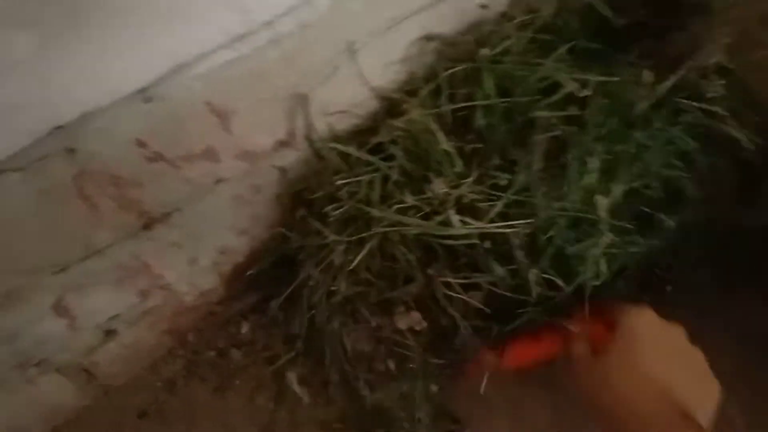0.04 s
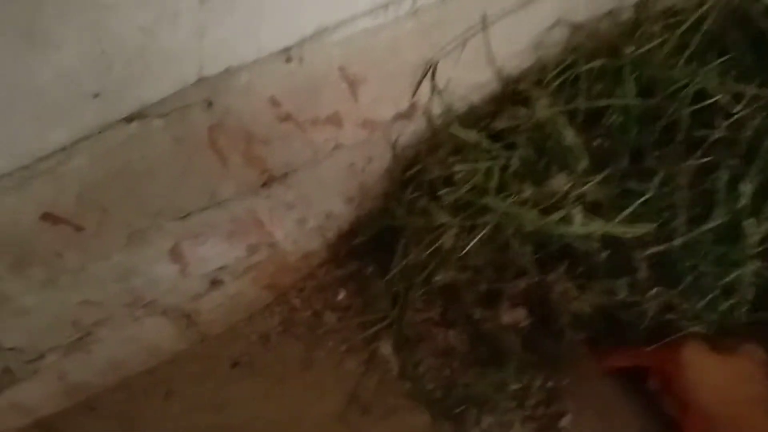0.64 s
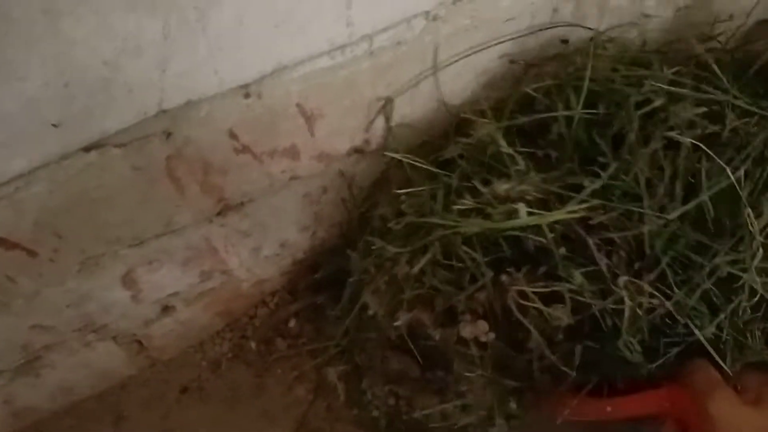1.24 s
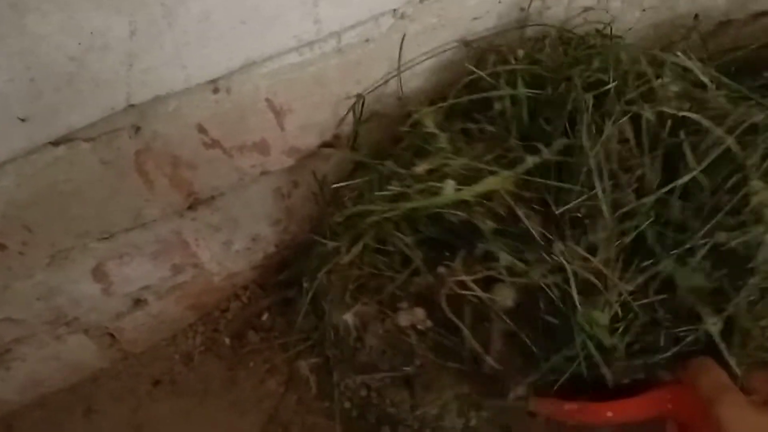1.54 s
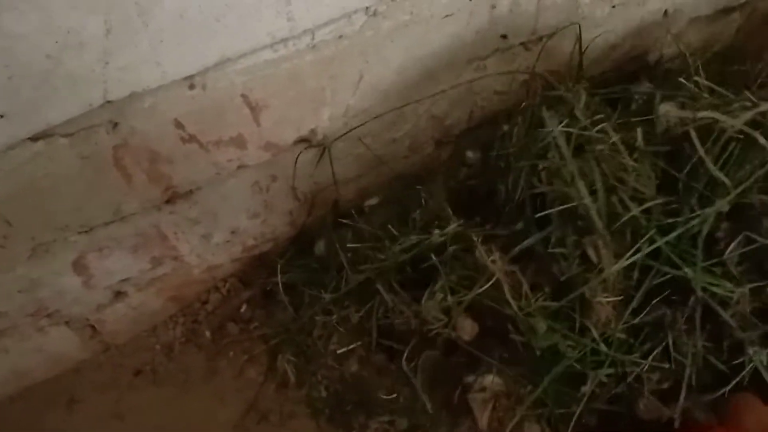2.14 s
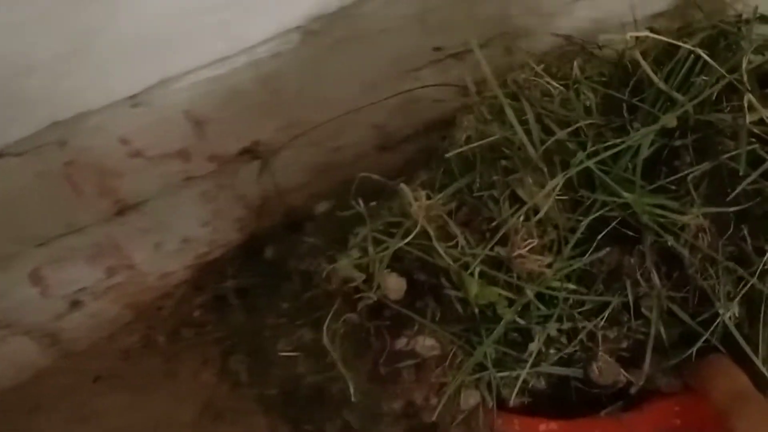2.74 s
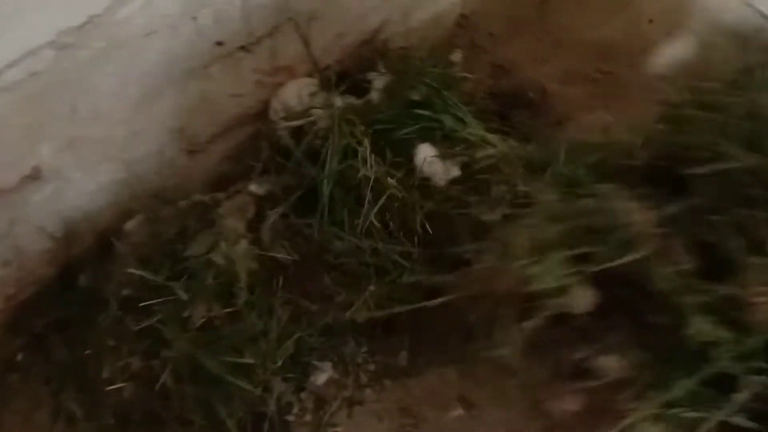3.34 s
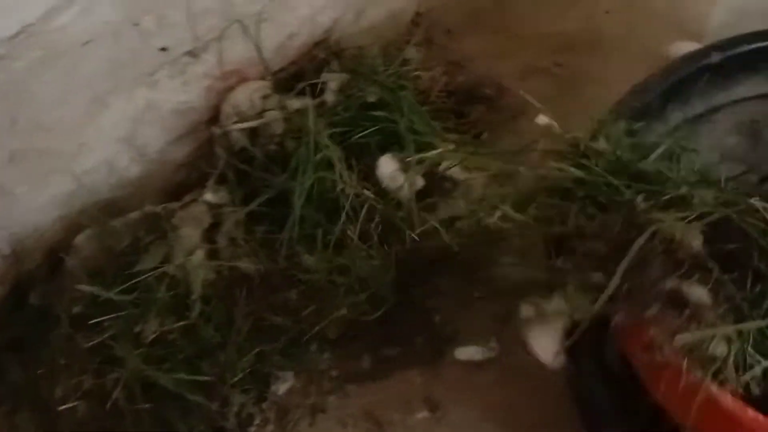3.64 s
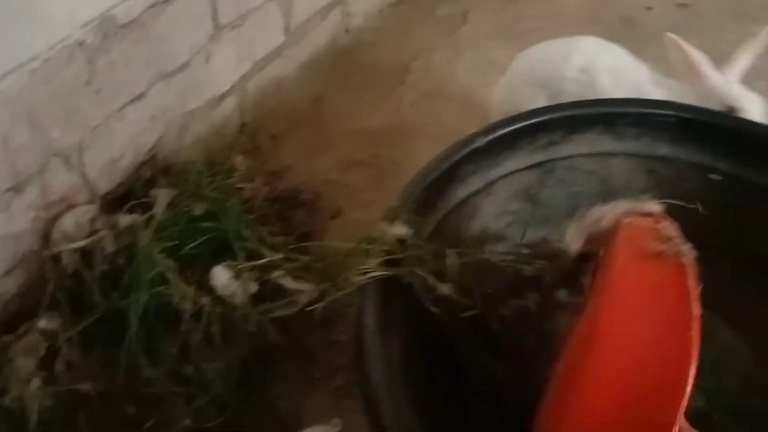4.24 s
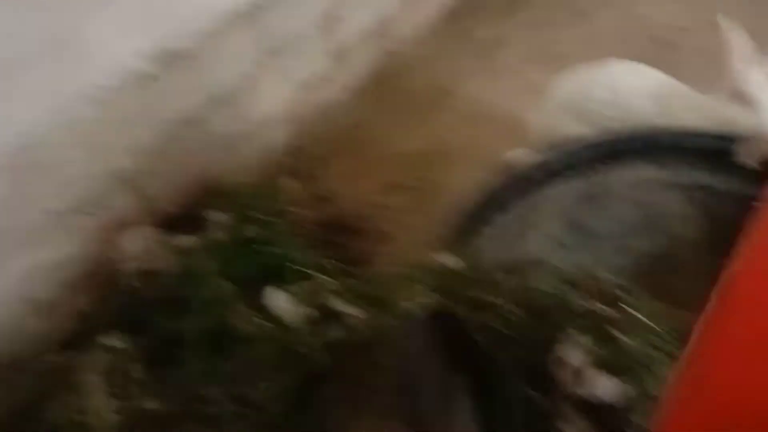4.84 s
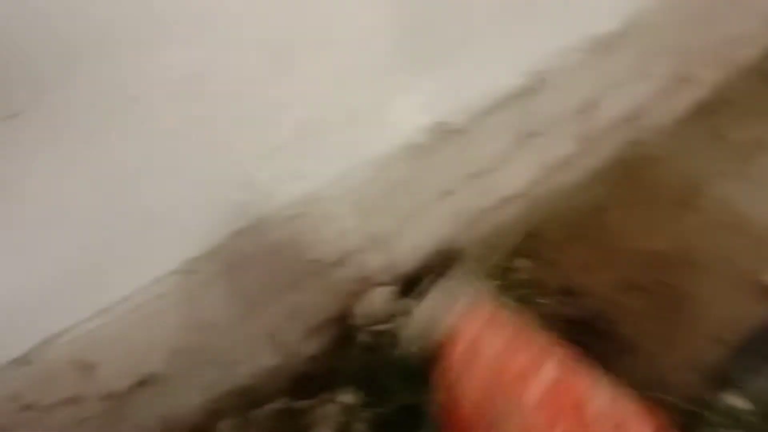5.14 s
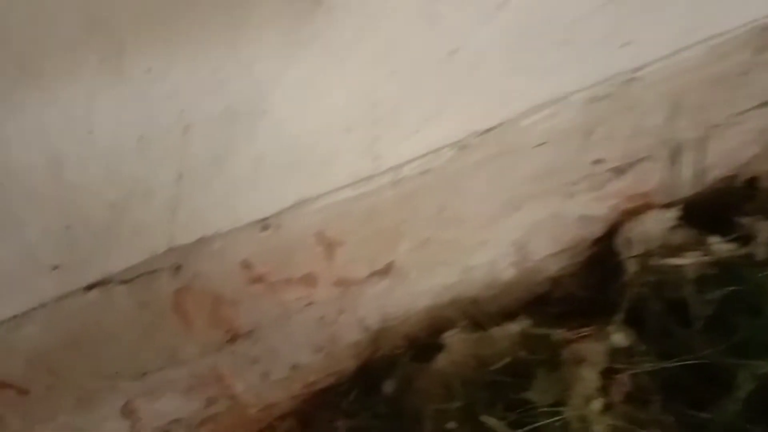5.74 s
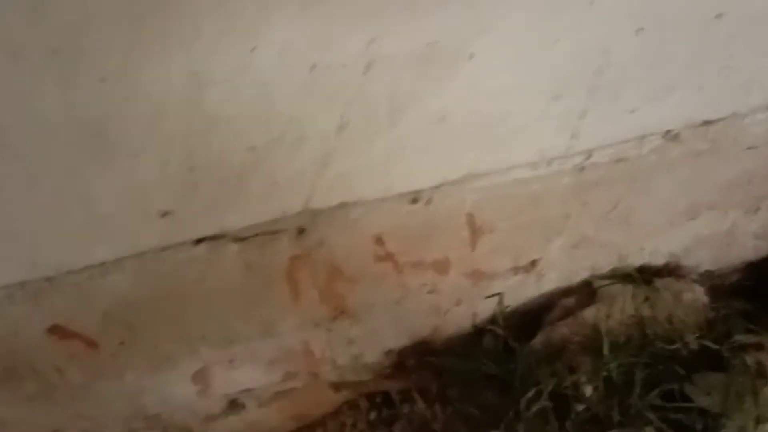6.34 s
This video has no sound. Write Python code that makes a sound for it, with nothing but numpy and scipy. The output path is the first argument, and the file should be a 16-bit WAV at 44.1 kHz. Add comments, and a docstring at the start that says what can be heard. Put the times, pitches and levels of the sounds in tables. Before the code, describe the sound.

Close, gritty scrapes of a plastic scoop pushing hay and droppings over concrete, light at first, with faint rustling and small snaps between them. Then comes a loud cluster of hollow knocks, thuds and rasps as the scoop empties into a tub. It dies away, and a final forceful scrape follows with clicks and short squeals. The small room adds a brief echo, and a faint low rumble lies under the strokes.

```python
"""First comes a knock and a gritty scrape: a plastic dustpan is pushed through hay and droppings over
a concrete floor, in a small room. Grit catches the lip and excites the resonances of the plate and the
hollow of the scoop; dry stalks crackle and snap, and stick-slip friction adds brief squeals.
The pan knocks, thuds and skids as a load is tipped into a tub, then starts one more hard stroke."""
import sys
import numpy as np
from scipy import signal
from scipy.fft import rfft, irfft, next_fast_len
from scipy.io import wavfile
from scipy.ndimage import uniform_filter1d

SR = 44100
rng = np.random.default_rng(int(sys.argv[2]) if len(sys.argv) > 2 else 0)


def wrap_up_sound(samples):
    """Save the sound to the file named by the first command line argument, as 16-bit audio."""
    columns = np.atleast_2d(samples).T
    # keep every value between -1 and 1, then stretch to whole-number steps
    tamed = np.clip(columns, -1, 1)
    steps = np.round(tamed * 32767).astype(np.int16)
    wavfile.write(sys.argv[1], SR, steps)


N = 281609

# Modes of the pan's flat plate, stiff lip and thin edge: f/Hz, bandwidth/Hz, level/dB
PLATE_MODES = [(597, 120, -12.5), (791, 109, -6), (914, 91, 0), (1050, 240, -2), (1242, 187, 0.5),
               (1435, 180, -1.5), (1654, 222, -5), (1905, 280, -11)]
LIP_MODES = [(2220, 310, 1.5), (2520, 260, 2.5), (2950, 280, 3.5), (3354, 260, 4.5), (3870, 650, -6)]
EDGE_MODES = [(4750, 1100, -6.5), (5540, 510, 0.5), (6120, 410, -3), (7150, 900, -7)]
# Modes of the scoop's hollow, which change with grip and load: f/Hz, bandwidth/Hz, level/dB
HOLLOW_FLAT = [(370, 160, -9.5), (497, 63, -3.5)]
HOLLOW_LOADED = [(325.6, 24, 1.5), (417, 150, -3), (625, 96, 2.5)]
HOLLOW_LIFTED = [(318.6, 15, 4.5), (829, 33, -15.5), (1510, 38, -11)]
HOLLOW_TUB = [(144, 73, -16.5), (233, 46, -7), (259, 23, 0), (329.4, 30, 0), (485, 72, -15.5)]
HOLLOW_PRESSED = [(134, 46, -3.5), (183, 94, -5), (310, 120, -6.5), (427, 98, -2.5)]
# Grip -> modes of the hollow
HOLLOW_BY_GRIP = {"flat": HOLLOW_FLAT, "loaded": HOLLOW_LOADED, "lifted": HOLLOW_LIFTED, "tub": HOLLOW_TUB,
                  "pressed": HOLLOW_PRESSED}
# Moves of the pan: start/s, rise/s, hold/s, slowing/s, time for grit to gather/s,
# plate/dB, lip/dB, edge/dB, hollow/dB, hay/dB, arm/dB, grip
STROKES = [(0, .004, 0.03, .64, .004, -30, -31.5, -31.5, -45.5, -38, -71.5, "flat"),
           (0.272, .08, 0.024, .36, .05, -43.5, -52.5, -44.5, -66, -48.5, -71.5, "flat"),
           (0.542, .13, 0.027, .28, 0.056, -50, -56.5, -53, -73.5, -60, -79, "flat"),
           (1.456, 0.27, 0.2, .2, .22, -53.5, -53, -48, -64.5, -51.5, -66, "loaded"),
           (1.815, 0.1, 0.052, 0.56, 0.088, -41, -48, -42.5, -52.5, -42.5, -73, "loaded"),
           (1.99, .15, 0.037, 0.17, .05, -47.5, -76, -69, -61.5, -62, -86, "loaded"),
           (2.78, 0.3, 0.25, .16, .4, -77.5, -73, -72, -62, -91.5, -78, "lifted"),
           (3.33, 0.1, 0.017, .05, .05, -61.5, -68.5, -70.5, -75.5, -81.5, -79, "lifted"),
           (3.451, .012, .17, .15, 0.046, -35, -47, -49.5, -49, -56.5, -66, "tub"),
           (3.581, .1, .27, 0.84, .38, -24.5, -32, -29.5, -35.5, -36, -64, "tub"),
           (4.282, .08, 0.085, 0.47, .05, -44, -52, -54, -63, -53.5, -76, "tub"),
           (5.545, .065, 0.51, .52, .26, -26.5, -30, -29.5, -40, -37, -59.5, "pressed")]
# Part -> exponent relating amplitude to speed; the treble dies first, the bass last
SPEED_POWER = {"plate": 4.05, "lip": 4.9, "edge": 5.03, "hollow": 2.26, "hay": 4.8, "arm": 0.99}
# Part -> level offset/dB before grit has gathered under the lip
BARE_DB = {"plate": -2.5, "lip": -10, "edge": -16.5, "hollow": 4, "hay": -10, "arm": 1}
# Spectra of crackling hay, arm rumble and room air: f/Hz, level/dB
CRACKLE_SPECTRUM = [(1500, -24), (3000, -4.5), (5500, -2), (7500, 1.5), (9000, -1.5), (11000, -1.5),
                    (13500, 0), (15500, 1.5)]
RUMBLE_SPECTRUM = [(20, -31), (50, -12), (80, 3.5), (115, 1.5), (180, -25), (800, -80)]
AIR_SPECTRUM = [(15, -39), (25, -19), (95, 0), (264, 1), (621, -7.5), (1350, -5.5), (2300, -16),
                (7280, -27.5), (7890, -10), (11200, -29.5), (15000, -36.5)]
# The lip catches or strikes: t/s, favoured f/Hz, plate/dB, lip/dB
KNOCKS = [(.0056, 1270, -33, -28), (0.4207, 1330, -45, -49), (1.8063, 877, -38.5, -63),
          (1.8704, 1200, -35.5, -55), (3.258, 866, -46.5, -66.5), (3.387, 1640, -53.5, -68.5),
          (3.4579, 982, -21.5, -36), (3.5429, 783, -23.5, -36), (3.5662, 790, -27, -56),
          (3.609, 1019, -28, -50), (3.6502, 1255, -13.5, -32.5), (3.6642, 946, -23.5, -32),
          (3.682, 1188, -44, -29.5), (3.721, 1363, -19, -23), (3.7371, 1580, -22, -27),
          (3.7838, 1114, -20.5, -50), (3.809, 1160, -18, -30.5), (3.8645, 1390, -21, -28.5),
          (4.3778, 1300, -40, -42.5), (4.859, 1594, -67, -87), (5.555, 860, -42, -34.5),
          (5.5931, 1620, -31, -38.5), (5.603, 1570, -36, -38), (5.657, 1610, -27, -27),
          (5.8053, 1120, -29, -35), (5.9224, 1090, -46, -25.5), (6.0296, 1290, -22, -39),
          (6.0808, 1600, -22.5, -25.5)]
# The lip slides free: t/s, duration/s, level/dB
SKIDS = [(0.334, 0.033, -43), (1.911, 0.0365, -34.5), (3.899, 0.03, -21), (3.909, 0.02, -15)]
# Envelope of stalks easing in the disturbed heap: t/s, level/dB
SETTLING_ENVELOPE = [(.45, -73), (1.05, -61), (1.5, -63), (2.2, -55.5), (2.33, -73.5), (2.6, -69.5),
                     (3.4, -63), (4.75, -78), (4.95, -85.5), (5.5, -91)]
# Modes of dry stalks: f/Hz, bandwidth/Hz, level/dB
STALK_MODES = [(1430, 360, -6.5), (1870, 730, -15), (2510, 150, -5.5), (3420, 470, -5.5), (3800, 560, -12),
               (4915, 820, -5.5), (5670, 470, 2), (6440, 520, -1.5), (7760, 780, -0.5), (8700, 1300, -6),
               (10200, 420, -4)]
# Single stalks break: t/s, f/Hz, level/dB
STALK_SNAPS = [(.5967, 5530, -62), (1.1172, 5540, -53), (1.731, 6340, -45.5), (2.372, 4900, -58),
               (2.4557, 6400, -63), (2.5378, 6980, -61.5), (2.867, 6240, -61), (3.0014, 4900, -54.5),
               (4.6025, 5200, -53.5), (4.7675, 5870, -57.5), (5.515, 5600, -59), (5.5253, 6990, -45.5),
               (5.8809, 6570, -30)]
# Stick-slip on one mode of the pan: t/s, duration/s, start f/Hz, end f/Hz, level/dB
SQUEALS = [(.601, 0.23, 800, 1088, -64.5), (.681, 0.29, 1108, 1263, -69), (1.314, 0.1, 3400, 3320, -65),
           (1.519, 0.33, 732, 713, -68), (2.135, 0.051, 317, 320, -54), (2.815, 0.18, 781, 750, -67.5),
           (2.901, .17, 1450, 1346, -63), (4.74, 0.11, 1636, 1604, -71), (5.589, 0.024, 1617, 1638, -25.5),
           (5.768, 0.122, 2902, 3030, -28), (6.022, 0.074, 1404, 1493, -31)]
# Envelope of the edge's squeak: t/s, level/dB
SQUEAK_ENVELOPE = [(3.0, -68.5), (3.08, -62), (3.18, -57.5), (3.27, -59.5), (3.38, -68.5)]
# Partials of that squeak: f/Hz, level/dB
SQUEAK_TONES = [(2850, -3.5), (3900, -13.5), (4900, -1.5), (5350, -10), (6700, -8.5)]
# Soft blows on the hollow plastic: t/s, level/dB
THUDS = [(3.557, -25.5), (3.673, -32), (3.97, -33), (4.138, -28), (4.646, -62.5), (5.559, -45)]
# Reverberation time of the room: f/Hz, T60/s
ROOM_DECAY = [(150, 0.1), (1000, 0.5), (4000, 0.45), (12000, 0.29)]


def amp(db):
    """Amplitude ratio of a level in decibels."""
    return 10 ** (np.asarray(db) / 20)


def unit(x):
    """Normalisation to rms 1."""
    return x / np.sqrt(np.mean(x ** 2) + 1e-20)


def unit_hit(x):
    """Normalisation of an impact to the energy of 10 ms at rms 1."""
    return x * np.sqrt(SR / 100) / np.linalg.norm(x)


def even(x, span_s=0.079):
    """Division by the running rms steadies the slow level and keeps the fast spikes."""
    power = np.abs(uniform_filter1d(x ** 2, int(span_s * SR)))
    return x / np.sqrt(power + 1e-6 * np.mean(x ** 2))


def along(points, hz):
    """Interpolation on a logarithmic frequency axis."""
    f, values = np.transpose(points)
    return np.interp(np.log(hz + 1), np.log(f + 1), values)


def envelope(rows, fade_s=0.013):
    """Gain per sample, interpolated in decibels and faded out beyond the ends."""
    times, levels = np.transpose(rows)
    t = np.arange(N) / SR
    gate = np.clip(1 + np.minimum(t - times[0], times[-1] - t) / fade_s, 0, 1)
    return gate * amp(np.interp(t, times, levels))


def wobble(rate):
    """Random modulation of unit variance, with rate knots a second."""
    knots = rng.standard_normal(int(N * rate / SR) + 4)
    return np.interp(np.arange(N) * rate / SR, np.arange(len(knots)), knots) * np.sqrt(3 / 2)


def filtered(x, response):
    """Linear filtering: the spectrum is multiplied by a frequency response."""
    size = next_fast_len(len(x) + 8192)
    return irfft(rfft(x, size) * response(np.fft.rfftfreq(size, 1 / SR)), size)[:len(x)]


def coloured(x, spectrum):
    """Spectral shaping by rows of f/Hz, level/dB."""
    return filtered(x, lambda hz: amp(along(spectrum, hz)))


def add(track, start_s, x):
    """Superposition of x on the track."""
    i = max(round(start_s * SR), 0)
    track[i:i + len(x)] += x[:len(track) - i]


def ping(hz, t60, t):
    """Free decay of one mode, with unit energy."""
    wave = np.cos(2 * np.pi * hz * t) * amp(-60 * t / t60)
    return wave / np.linalg.norm(wave)


def ring(force, modes):
    """Forced response of a sum of damped modes; a small body radiates no deep bass."""
    t = np.arange(SR // 10) / SR
    response = sum((-1) ** k * amp(db) * width * np.exp(-np.pi * width * t) * np.cos(2 * np.pi * hz * t)
                   for k, (hz, width, db) in enumerate(modes))
    low_cut = signal.butter(2, min(mode[0] for mode in modes) / 2, 'high', fs=SR, output='sos')
    return signal.sosfilt(low_cut, signal.oaconvolve(force, response)[:len(force)])


def moving_contact(force, modes, shift_db, rate):
    """Modal coupling: as the contact point moves, each mode is driven more or less strongly."""
    return even(sum((-1) ** k * amp(shift_db * wobble(rate)) * ring(force, [mode])
                    for k, mode in enumerate(modes)))


def grains(rate, spread_db, clump_db, clump_rate):
    """Shot noise: tiny random impacts whose uneven sizes swell in clumps."""
    hit = rng.random(N) < rate / SR
    size = amp(spread_db * np.minimum(rng.exponential(size=N), 3) + clump_db * wobble(clump_rate))
    return hit * size * rng.choice([-1, 1], N)


def drive(part, grip=None):
    """A part's amplitude follows a power law of speed; strokes (all, or one grip's) add in energy."""
    power = np.zeros(N)
    for start, rise, hold, slowing, gathering, *levels, held in STROKES:
        if grip in (None, held):
            t = np.arange(int((rise + hold + slowing) * SR)) / SR
            speed = np.sin(np.pi / 2 * np.clip(t / rise, 0, 1))
            speed *= np.clip(1 - (t - rise - hold) / slowing, 0, 1)
            bare = np.clip(1 - t / gathering, 0, 1)
            db = dict(zip(SPEED_POWER, levels))[part] + BARE_DB[part] * bare
            add(power, start, (amp(db) * speed ** SPEED_POWER[part]) ** 2)
    return np.sqrt(power)


def scraping():
    """Roughness excitation: coarse lumps jolt the whole pan; fine sand keeps its lip hissing."""
    lumps = unit(grains(rate=520, spread_db=1.5, clump_db=1.0, clump_rate=70))
    sand = unit(grains(rate=6000, spread_db=3, clump_db=1.4, clump_rate=140))
    plate = drive("plate") * moving_contact(lumps + 0.51 * sand, PLATE_MODES, shift_db=2, rate=14)
    lip = drive("lip") * moving_contact(0.08 * lumps + sand, LIP_MODES, shift_db=2, rate=12)
    edge = drive("edge") * moving_contact(0.067 * lumps + sand, EDGE_MODES, shift_db=4, rate=12)
    hollow = sum(drive("hollow", grip) * even(ring(lumps + sand, modes))
                 for grip, modes in HOLLOW_BY_GRIP.items())
    return plate + lip + edge + amp(-1 + 2.5 * wobble(22)) * hollow


def hay_crackle(resting_db=-11, snaps_db=-3, snap_t60=0.006):
    """Brittle fracture: stalks crackle when shoved, faintly as they settle; thicker ones snap."""
    cracks = unit(grains(rate=3000, spread_db=3.8, clump_db=2, clump_rate=70))
    breaks = unit(grains(rate=45, spread_db=1, clump_db=5.5, clump_rate=8))
    t = np.arange(SR // 50) / SR
    burst = rng.standard_normal(len(t)) * amp(-60 * t / snap_t60)
    snaps = unit(signal.oaconvolve(breaks, burst)[:N])
    level = np.hypot(drive("hay"), amp(resting_db) * envelope(SETTLING_ENVELOPE))
    return level * even(coloured(cracks + amp(snaps_db) * snaps, CRACKLE_SPECTRUM))


def arm_rumble(level_db=-1, jolt_db=4.5):
    """Amplitude-modulated noise: arm movements put a dull, uneven rumble under each stroke."""
    rumble = unit(coloured(rng.standard_normal(N), RUMBLE_SPECTRUM))
    return amp(level_db + jolt_db * wobble(14)) * drive("arm") * rumble


def room_air(level_db=-80):
    """Stationary coloured noise: the faint air of the room."""
    return amp(level_db) * unit(coloured(rng.standard_normal(N), AIR_SPECTRUM))


def knocks(blows, chatter_t60=0.028, rebound_s=0.0019, bite_s=0.00051, crack_db=-13):
    """Impact excitation by contact, rebound and chatter; the spot struck favours one plate mode."""
    out, t = np.zeros(N), np.arange(SR // 10) / SR
    damping = amp(-60 * t / chatter_t60)
    bite = 1 - np.exp(-t / bite_s)  # the soft plastic takes a moment to make full contact
    soften = signal.butter(2, 8500, fs=SR, output='sos')
    blunt = signal.butter(4, 1850, fs=SR, output='sos')  # a blunt blow misses the upper modes
    for start, hz, plate_db, lip_db in blows:
        force = 0.19 * rng.standard_normal(len(t)) * damping
        force[0] += 1
        force[int(rebound_s * SR * rng.uniform(.8, 1.2))] += 0.66
        plate = signal.sosfilt(blunt, ring(force, PLATE_MODES)) * np.sqrt(damping)  # hay damps it
        body = unit_hit(plate / np.linalg.norm(plate) + ping(hz, chatter_t60, t))
        hardness = amp(min(lip_db - plate_db, 0) * 1.4)  # dull blows have little crack
        crack = hardness * amp(crack_db) * unit_hit(bite * force)
        click = unit_hit(ring(bite * force, LIP_MODES + EDGE_MODES)) + crack
        add(out, start, amp(plate_db) * body + amp(lip_db) * signal.sosfilt(soften, click))
    return out


def grit_catches(count=45, scatter_db=2):
    """Random impacts, as knock rows: larger grit trips the lip, harder as the pan moves faster."""
    plate_db, lip_db = (20 * np.log10(drive(part) + 1e-9) for part in ("plate", "lip"))
    rows = []
    for i in rng.integers(N, size=count):
        hz = PLATE_MODES[rng.integers(len(PLATE_MODES))][0]
        rows.append((i / SR, hz, plate_db[i] - 3 + scatter_db * rng.standard_normal(), lip_db[i] - 2))
    return rows


def skids(hiss_db=-11, edge_db=2):
    """Sliding friction: a fast slide drives lip and edge with broadband noise, a bright rasp."""
    out = np.zeros(N)
    for start, length, db in SKIDS:
        n = int(length * SR)
        force = rng.standard_normal(n)
        rasp = unit(unit(ring(force, LIP_MODES)) + amp(edge_db) * unit(ring(force, EDGE_MODES)))
        add(out, start, amp(db) * signal.windows.tukey(n, .3) * (rasp + amp(hiss_db) * force))
    return out


def hay_settling(stalks_db=1, plate_db=-12):
    """Light friction: resting stalks rub one another and brush the plate of the pan."""
    rub = grains(rate=3200, spread_db=2, clump_db=7, clump_rate=15)
    stalks = amp(stalks_db) * moving_contact(rub, STALK_MODES, shift_db=2.5, rate=15)
    plate = amp(plate_db) * moving_contact(rub, PLATE_MODES, shift_db=8.5, rate=9)
    return envelope(SETTLING_ENVELOPE) * (stalks + plate)


def stalk_snaps(burst_t60=0.019, ring_t60=0.045, ring_db=-5, bend_s=0.00051):
    """Release of elastic energy: a stalk bends, then breaks with a dry click and a brief ring."""
    out, t = np.zeros(N), np.arange(SR // 10) / SR
    onset = 1 - np.exp(-t / bend_s)
    for start, hz, db in STALK_SNAPS:
        octave = signal.butter(2, [hz / np.sqrt(2), hz * np.sqrt(2)], 'band', fs=SR, output='sos')
        burst = rng.standard_normal(len(t)) * amp(-60 * t / burst_t60)
        click = unit_hit(signal.sosfilt(octave, ring(burst, STALK_MODES)))
        tone = amp(ring_db) * unit_hit(ping(hz, ring_t60, t))
        add(out, start, amp(db) * onset * (click + tone))
    return out


def stick_slip(hz, waver):
    """Friction oscillation along a pitch curve, roughened in amplitude and frequency."""
    n = len(hz)
    roughness = amp(4.4 * wobble(260)[:n])
    pitch = hz * (1 + waver * wobble(400)[:n])
    return unit(roughness * np.sin(2 * np.pi * np.cumsum(pitch) / SR))


def squeals():
    """Mode locking: stick-slip settles briefly on one mode of the pan, swelling and fading."""
    out = np.zeros(N)
    for start, length, start_hz, end_hz, db in SQUEALS:
        n = int(length * SR)
        tone = stick_slip(np.linspace(start_hz, end_hz, n), waver=0.045)
        add(out, start, amp(db) * signal.windows.tukey(n, .7) * tone)
    return out


def judder(start_s=1.975, first_gap_s=0.035, shrink=0.88, centre_hz=1226, loss_db=1):
    """A geometric series of knock rows: under the heap each catch comes sooner and softer."""
    rows = []
    for k in range(7):
        time = start_s + first_gap_s * (1 - shrink ** k) / (1 - shrink)
        hz = centre_hz * np.exp(0.25 * rng.standard_normal())
        rows.append((time, hz, -34 - loss_db * k, -45.5 - loss_db * k))
    return rows


def edge_squeak():
    """Stick-slip under a light drag: the edge sings on a few thin, rough tones."""
    tones = sum(amp(db) * stick_slip(np.full(N, hz), waver=0.018) for hz, db in SQUEAK_TONES)
    return envelope(SQUEAK_ENVELOPE) * unit(tones)


def thuds(push_t60=0.055, trim_db=-9):
    """Cavity resonance: soft clumps land and boom in the hollow plastic."""
    out, t = np.zeros(N), np.arange(SR // 10) / SR
    light = signal.butter(3, 190, 'high', fs=SR, output='sos')  # light hay barely moves the lowest mode
    for start, db in THUDS:
        push = signal.sosfilt(light, rng.standard_normal(len(t)) * amp(-60 * t / push_t60))
        add(out, start, amp(db + trim_db) * unit(ring(push, HOLLOW_TUB)))
    return out


def room(x, wet_db=-10, delay_s=0.004):
    """Reverberation: reflections from bare walls merge into a short, dense tail."""
    hz, t, noise = signal.stft(rng.standard_normal(SR // 2), SR, nperseg=256)
    decay = amp(-60 * t / along(ROOM_DECAY, hz)[:, None])
    tail = signal.istft(noise * decay, SR, nperseg=256)[1]
    tail = np.pad(tail / np.linalg.norm(tail), (int(delay_s * SR), 0))
    return x + amp(wet_db) * signal.fftconvolve(x, tail)[:N]


def scene():
    """Superposition: pan and hay reverberate in the room, over arm rumble and faint air."""
    pan = scraping() + knocks(KNOCKS + grit_catches() + judder())
    pan += skids() + squeals() + edge_squeak() + thuds()
    hay = hay_crackle() + hay_settling() + stalk_snaps()
    return (room(pan + hay) + arm_rumble() + room_air())[None]


def record(dry, bass_hz=55, top_hz=15750):
    """Band limiting: a small microphone loses the deep bass, and the highest treble is cut off."""
    thin = signal.sosfilt(signal.butter(2, bass_hz, 'high', fs=SR, output='sos'), dry[0])
    return filtered(thin, lambda hz: np.clip((top_hz - hz) / 300 + .5, 0, 1))[None]


dry = scene()
out = record(dry)
wrap_up_sound(out)
```